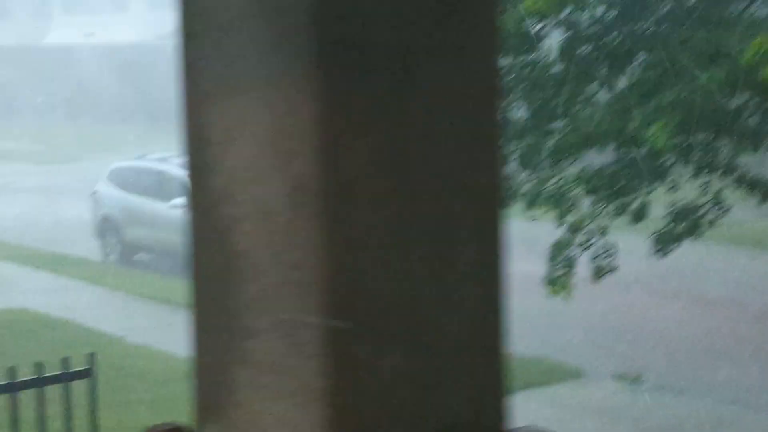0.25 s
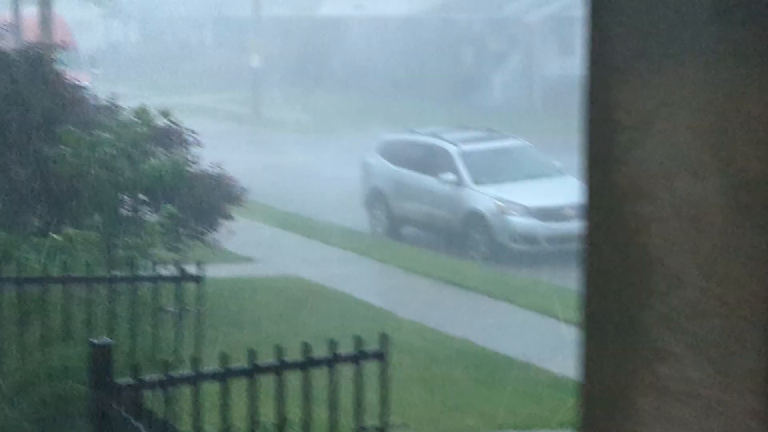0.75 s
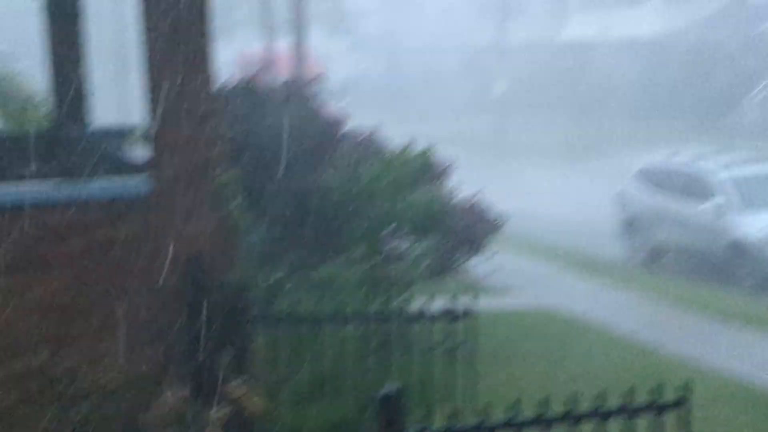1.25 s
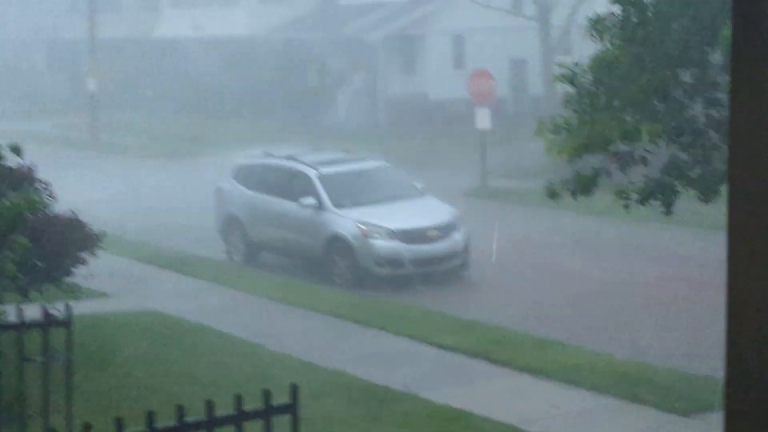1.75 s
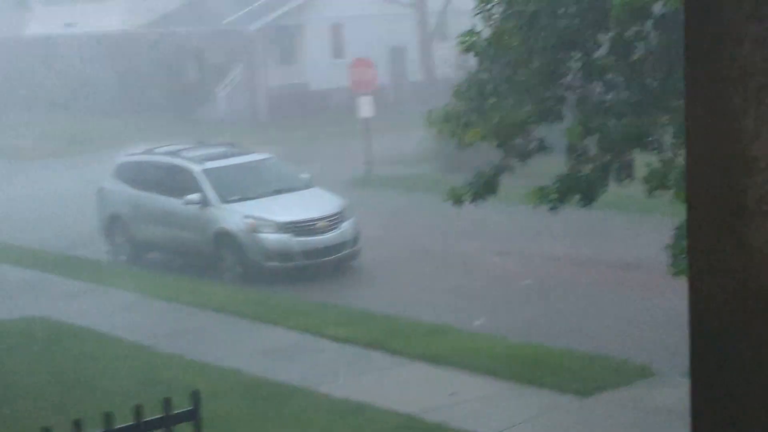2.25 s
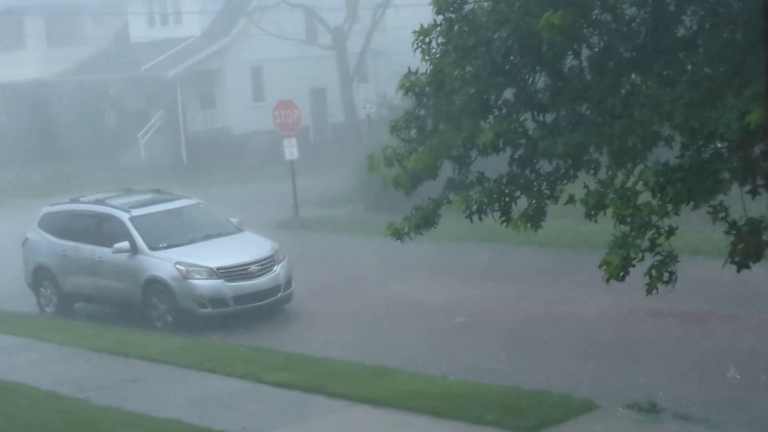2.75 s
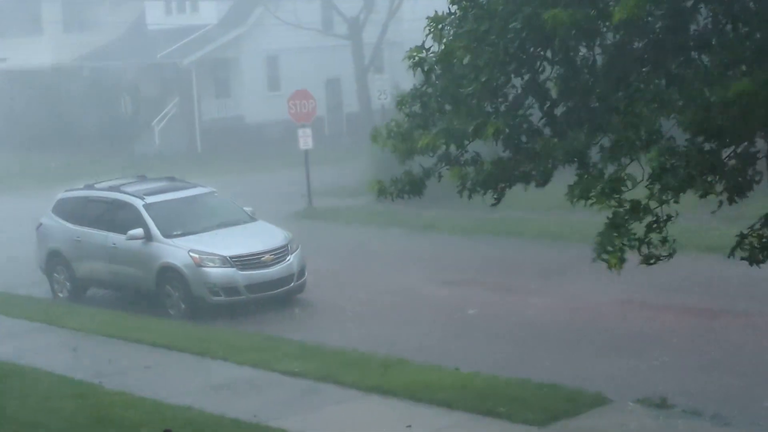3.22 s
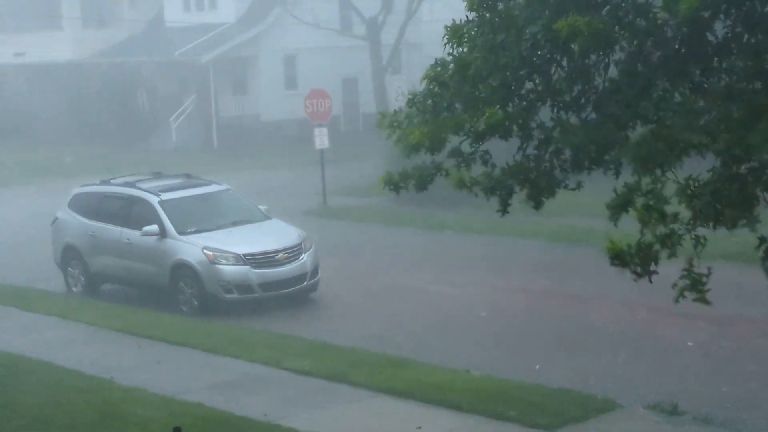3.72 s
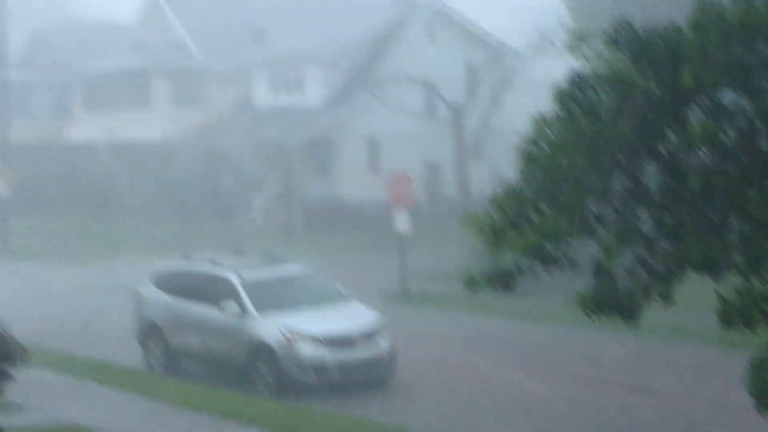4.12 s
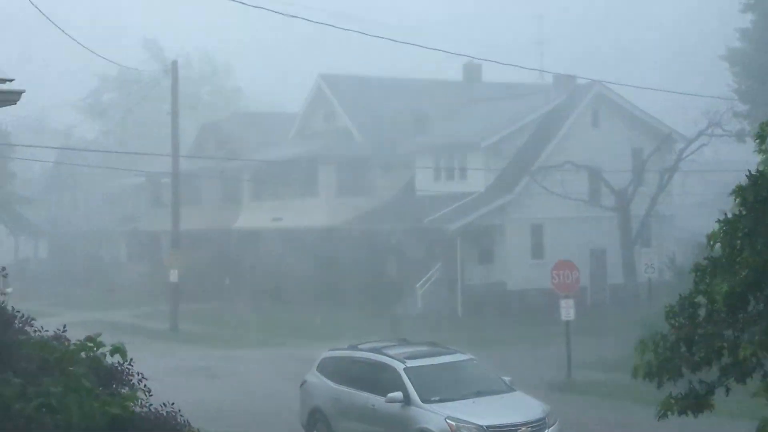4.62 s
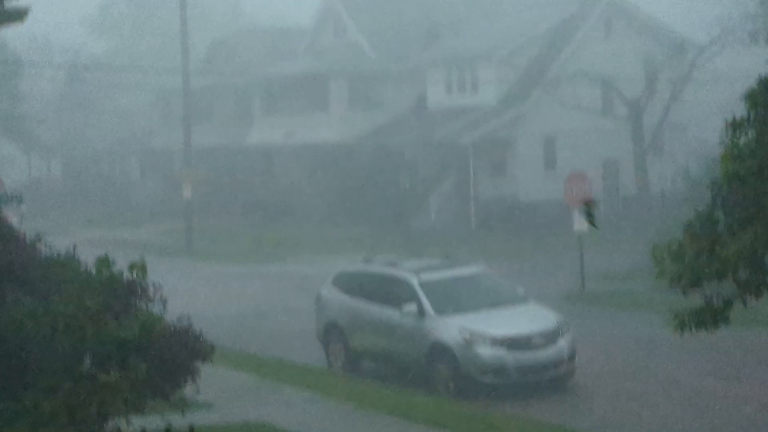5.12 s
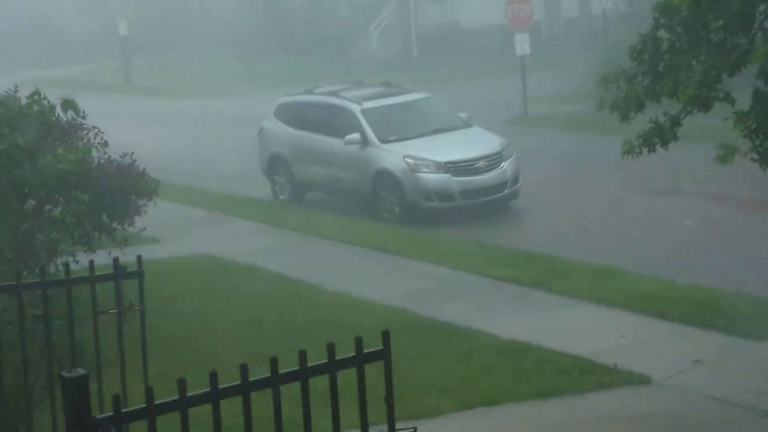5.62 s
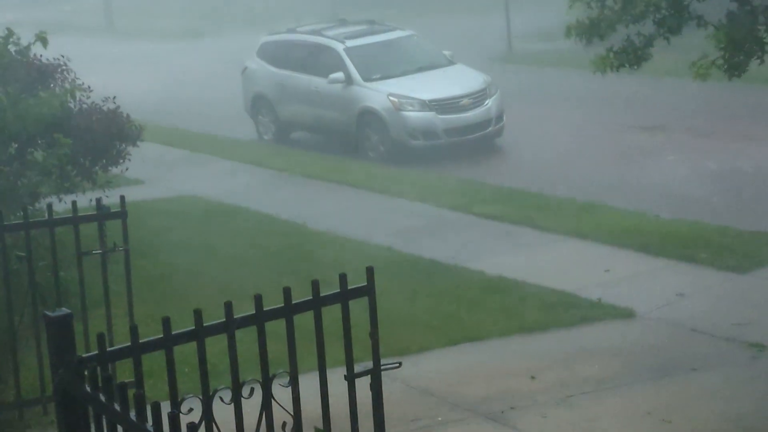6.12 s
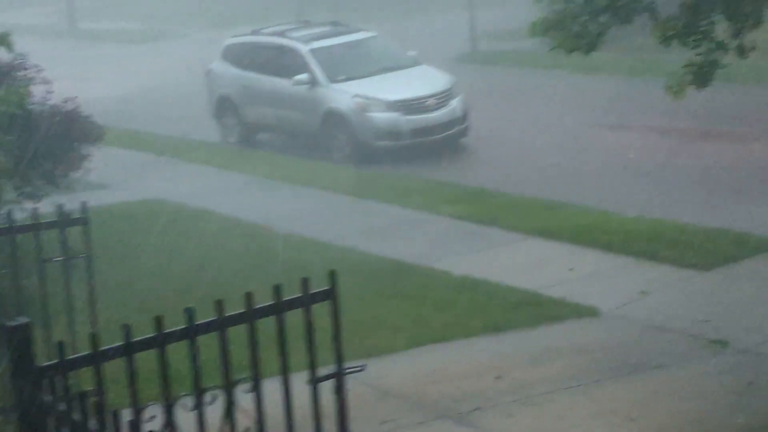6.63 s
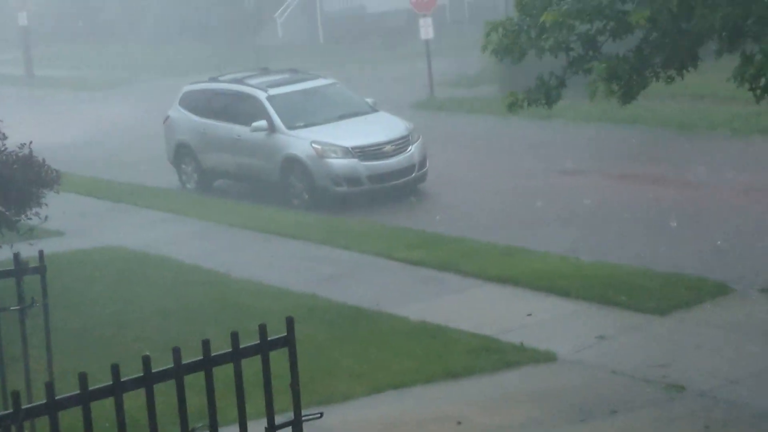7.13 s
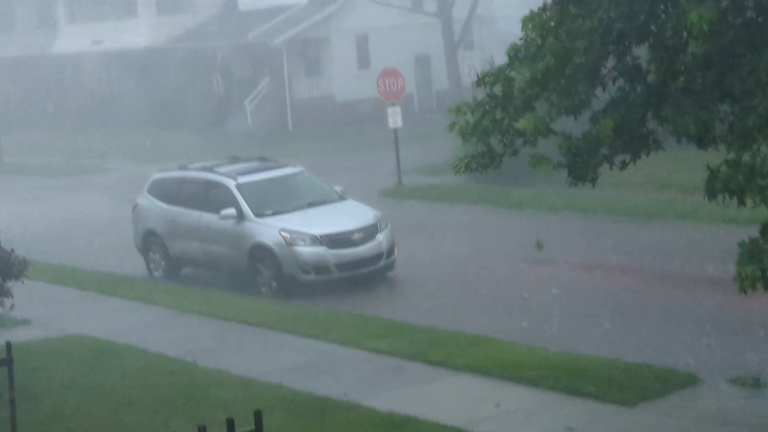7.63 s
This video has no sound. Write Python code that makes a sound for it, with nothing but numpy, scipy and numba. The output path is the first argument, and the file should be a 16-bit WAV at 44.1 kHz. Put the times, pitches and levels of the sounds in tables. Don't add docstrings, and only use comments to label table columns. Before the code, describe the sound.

Dense, wide rain hiss with fine patter and a low storm roar, already at full strength when it begins. Irregular wet slaps, bright sprays and plinking drops fall within reach. Early gusts buffet the left side of a phone-like microphone, with a few drops popping directly on it; after about three seconds the wind drops away and steady rain remains.

```python
import sys
import numpy as np
from scipy import signal
from scipy.fft import rfft, irfft, next_fast_len
from scipy.io import wavfile
from scipy.ndimage import uniform_filter1d
from numba import njit

SR = 44100
rng = np.random.default_rng(int(sys.argv[2]) if len(sys.argv) > 2 else 0)


def boost(x):
    u = np.asarray(x, float) / 20
    return 10 ** u


def transcribe(signal):
    frames = np.atleast_2d(signal).T
    limited = np.clip(frames, -1, 1)
    pcm = np.round(limited * 32767).astype(np.int16)
    wavfile.write(sys.argv[1], SR, pcm)


N = 346626
PORT_GAP = 21


def unit(x):
    return x / np.sqrt(np.mean(x ** 2))


def curves(table):
    s, *columns = np.transpose(table)
    return [np.interp(np.arange(N) / SR, s, c) for c in columns]


def colour(x, hz, db):
    size = next_fast_len(N)
    log_hz = np.log(np.arange(size // 2 + 1) * SR / size + 1)
    gain = boost(np.interp(log_hz, np.log(hz), db))
    return irfft(rfft(x, size) * gain, size)[..., :N]


def walk(rate):
    hold = int(SR / rate)
    steps = np.repeat(rng.standard_normal(N // hold + 1), hold)
    return 2.06 * uniform_filter1d(uniform_filter1d(steps, hold), hold)[:N]


def surround(count=22):
    lags = np.linspace(-PORT_GAP, PORT_GAP, count).astype(int)
    waves = rng.standard_normal((count, N))
    left = waves.sum(axis=0)
    right = sum(np.roll(w, lag) for w, lag in zip(waves, lags))
    return unit(np.array([left, right]))


# (time [s], strength [dB], left minus right [dB])
RAIN_STRENGTH = [(0, -1.5, -3), (.5, -0.5, -1), (.85, -1.5, -2), (1.1, -1.5, -0.5), (1.42, -.3, -.5),
                 (1.73, -3, -1), (2.17, -0.5, -1.5), (2.8, -3, -1.5), (3.1, -2, -1.5), (3.65, -3.5, -2.5),
                 (4.0, -3, -3), (4.27, -1.5, -3.5), (4.7, -3, -2.5), (5.28, -3.5, -2), (5.65, -3, -1.5),
                 (6.6, -3.5, -1.5), (7.1, -1.8, -1.5), (7.86, -3, -1.5)]
MID_SHARE, LOW_SHARE = 0.81, 0.58


def sheet():
    size = next_fast_len(N)
    field = rfft(surround(), size)
    hz = np.arange(size // 2 + 1) * SR / size
    octave = np.clip(np.log2(hz / 500 + 1e-9), 0, 5)
    high_db, pan_db = (c - c.mean() for c in curves(RAIN_STRENGTH))
    mid_db, low_db = MID_SHARE * high_db, LOW_SHARE * high_db
    sweep_db = 0.3 * walk(12) + 0.4 * walk(30)
    out = 0
    for k, db in enumerate([low_db, low_db, mid_db, (mid_db + high_db) / 2, high_db, high_db]):
        band = irfft(field * np.clip(1 - abs(octave - k), 0, 1), size)[:, :N]
        flicker_db = 0.5 * walk(14)
        out = out + band * boost(db + sweep_db + flicker_db)
    return out * boost(np.array([pan_db, -pan_db]) / 2)


@njit
def grains(start, hz, cycles, size, lag):
    out = np.zeros((2, N + 2048))
    for k in range(len(start)):
        turn = np.exp((2j * np.pi - 1 / cycles[k]) * hz[k] / SR)
        z, i = size[k] + 0j, int(start[k]) + 64
        for j in range(min(int(5 * cycles[k] * SR / hz[k]), 1500)):
            out[0, i + j + int(lag[k])] += z.imag
            out[1, i + j] += z.imag
            z *= turn
    return out[:, 64:N + 64]


SPRAY_HZ = 800 * 2 ** np.arange(0, 4.5, .5)


def burst(s, spray_db, length, count):
    u = rng.random((len(s), 6, count))
    age = -np.log((1 - u[:, 0]) * (1 - u[:, 5]) ** .12) * length[:, None]
    hz = 600 * 27 ** u[:, 1]
    db = np.array([np.interp(np.log(f), np.log(SPRAY_HZ), d) for f, d in zip(hz, spray_db)])
    drop_db = db - 1.1 * np.log(1 - u[:, 2])
    size = boost(drop_db) * hz / 8000 / np.sqrt(count)
    lag = PORT_GAP * (2 * u[:, 3] ** 1.3 - 1)
    start = np.clip((s[:, None] + age) * SR, 0, N - 1)
    cycles = 2.5 + 4 * u[:, 4] ** 2
    return grains(start.ravel(), hz.ravel(), cycles.ravel(), size.ravel(), lag.ravel())


def patter(per_s=200):
    count = int(per_s * N / SR)
    u = rng.random((count, 7))
    tint_db = 13 * u[:, 3 + np.array([0, 0, 1, 1, 1, 2, 2, 3, 3])]
    spray_db = tint_db - 1.1 * np.log(1 - u[:, 1:2])
    spray = burst(u[:, 0] * N / SR, spray_db, .002 + .008 * u[:, 2], count=30)
    rain_db = curves(RAIN_STRENGTH)[0]
    return unit(spray) * boost(rain_db - rain_db.mean() - 6)


# (time [s], breeze at the left port [dB], storm roar [dB])
AIR = [(0, -44, -40.5), (.7, -42, -45), (1.0, -47, -40), (1.4, -45, -44.5), (2.1, -49, -39),
       (2.85, -41, -41.5), (3.1, -62, -43.5), (3.55, -58, -44), (3.7, -61, -46.5), (4.2, -58, -45.5),
       (4.75, -52, -45), (5.1, -51, -45.5), (5.8, -51, -44.5), (6.1, -51, -49), (6.6, -62, -47.5),
       (7.0, -63, -44.5), (7.45, -68, -44.5), (7.86, -67, -49)]
# (frequency [Hz], level per Hz [dB])
ROAR_COLOUR = [(15, -63), (25, -39), (46, -8), (81, 4), (200, -2), (236, 1), (344, 0), (467, -4),
               (700, -33), (910, -74), (1540, -120)]


def roar():
    rumble = unit(colour(surround(count=4), *np.transpose(ROAR_COLOUR)))
    return rumble * boost(curves(AIR)[1] + walk(10))


FALL_DB, CREST = 20, 0.23


def puffs(rows):
    power = np.zeros((2, N))
    for s, thump_db, flutter_db, length in rows:
        first = max(int((s - 3 * length) * SR), 0)
        last = min(int((s + 3 * length) * SR), N)
        span = np.arange(first, last)
        age = (span / SR - s) / length
        shape_db = FALL_DB * (CREST - np.hypot(age, CREST))
        power[:, span] += boost(2 * (np.array([[thump_db], [flutter_db]]) + shape_db))
    return power


def even(x, seconds=0.0234):
    return x / np.sqrt(uniform_filter1d(x ** 2, int(seconds * SR)) + .1)


# (frequency [Hz], level per Hz [dB])
WIND_COLOUR = [(30, -34), (60, -13), (95, 0), (140, -1), (290, 0), (460, -8), (800, -21), (1500, -32),
               (2500, -60)]
# (time [s], thump [dB], flutter [dB], length [s])
LEFT_PUFFS = [(.025, -31, -36, 0.047), (.085, -31.5, -36, 0.063), (.244, -29, -28.5, .04),
              (.344, -33, -29, 0.082), (.425, -34, -32, 0.033), (.489, -29, -29, 0.028),
              (.559, -30, -23.5, 0.017), (.6, -29, -39, .04), (.64, -26, -28, 0.038),
              (.685, -33, -29, .025), (.805, -29, -34, 0.028), (.966, -24.5, -31.5, 0.019),
              (1.02, -46, -40, 0.028), (1.222, -26, -32.5, 0.042), (1.287, -31, -36, .03),
              (1.61, -31, -39, .04), (1.665, -31, -36, 0.048), (1.745, -38, -36, 0.027),
              (1.83, -40, -42, .04), (.745, -38, -45, 0.037), (1.09, -40, -43, 0.05), (1.36, -38, -42, .04),
              (2.83, -35, -43, 0.054), (2.375, -33, -39, .03), (2.595, -30, -27, 0.023),
              (1.91, -31, -28, 0.045), (2.01, -35, -48, 0.049), (2.125, -43, -29, 0.047),
              (2.265, -13.5, -21.5, 0.014), (2.3, -18, -16, 0.042), (2.348, -20, -33, 0.024),
              (2.447, -31, -22, 0.023), (2.556, -15, -13, 0.021), (2.719, -29, -28, 0.027),
              (2.918, -31, -28.5, 0.046), (2.988, -38, -45, .04), (3.437, -40, -46, .06),
              (3.542, -40, -47, 0.041), (5.77, -36, -48, 0.068)]
# (time [s], thump [dB], flutter [dB], length [s])
RIGHT_PUFFS = [(.08, -38, -50, .05), (.244, -35, -44, 0.039), (.364, -29.5, -36, 0.055),
               (.6, -31, -38, 0.055), (1.022, -56, -40, 0.036), (1.195, -36, -40, .06),
               (1.95, -51, -37, .06), (2.125, -53, -31, 0.06), (2.3, -43, -39, 0.14),
               (2.719, -39, -41, .05), (5.213, -42, -55, 0.066), (5.745, -33.5, -41, 0.088)]
# (time [s], thump [dB], flutter [dB], length [s])
EDDIES = [(3.157, -45, -41, 0.05), (3.34, -54, -49, 0.055), (4.22, -53, -42, 0.038), (4.31, -59, -61, .035),
          (4.448, -56, -45, .05), (4.514, -43, -40, 0.088), (4.82, -64, -44, 0.034), (4.864, -45, -52, .05),
          (5.46, -39.5, -45, 0.044), (6.241, -51, -56, .1), (6.793, -43, -47, 0.076),
          (7.26, -59, -40, 0.061), (7.6, -57, -54, 0.063)]
LEE_DB, FLUTTER_DB = -11, -3


def wind():
    share_db = np.array([[[0], [LEE_DB]], [[FLUTTER_DB], [FLUTTER_DB + LEE_DB]]])
    breeze = boost(2 * (curves(AIR)[0] + 0.76 * walk(28) + share_db))
    gusts = np.stack([puffs(LEFT_PUFFS + EDDIES), puffs(RIGHT_PUFFS + EDDIES)], axis=1)
    turbulence = colour(rng.standard_normal((2, N)), *np.transpose(WIND_COLOUR))
    thump = colour(turbulence, [170, 250], [0, -40])
    flutter = turbulence - thump
    out = 0
    for part, power in zip((thump, flutter), breeze + gusts):
        out = out + np.sqrt(power) * even(unit(part * boost(2.0 * walk(70))))
    return colour(out, [30, 52, 85], [-32, -3, 1.5])


# (time [s], energy over 1 ms of rain [dB], tilt [dB per octave], length [s])
SLAPS = [(0.341, 13, -2, .017), (0.376, 10.5, -2, 0.012), (0.45, 2, 1, 0.0049), (0.6, 5, 4.5, 0.0063),
         (0.662, 11, 0.5, 0.0038), (0.687, 8, 0.5, 0.0057), (.717, 2, 0, 0.005), (0.975, 12, -0.5, 0.019),
         (1.272, 11, 2, 0.0056), (1.508, 7.5, -4, 0.0083), (1.831, 0, -7, .015), (1.95, 12.5, 0.5, 0.0074),
         (2.078, 18.5, 0, 0.019), (2.814, 11, 1.5, 0.02), (3.202, 11, -1.5, 0.0072),
         (3.224, 13, -0.5, 0.011), (3.425, 12.5, -1, 0.0091), (3.777, 15.5, -1, 0.013),
         (4.008, 13, 0.5, 0.02), (4.042, 15.5, 0, 0.02), (4.44, 7.5, -5.5, 0.00506), (4.645, 7, 3, 0.0048),
         (4.803, 12, -3, 0.0072), (4.992, 10, 0, 0.0086), (5.387, -11, 5, 0.0073), (5.969, 1, -7, 0.0045),
         (6.015, -4, -2, 0.0047), (6.553, 8.5, 1.5, 0.0038), (7.233, 12.5, -0.5, 0.006),
         (7.646, 9, 2, 0.0083)]
# (time [s], energy [dB], lowest pitch [Hz], length [s])
SPRAYS = [(0.21, 8, 4500, .003), (0.426, 13, 6500, .005), (0.96, 17.5, 7000, 0.0069),
          (1.248, 7, 2600, .011), (1.592, 16, 4500, 0.02), (2.198, 12, 5000, 0.0078),
          (2.458, 11, 6500, .01), (2.477, 5, 3600, 0.0046), (2.677, 16, 6500, 0.0057),
          (2.758, 16.5, 2900, 0.019), (3.313, 12, 2900, 0.0043), (3.607, 15, 4500, 0.016),
          (4.224, 13.5, 6500, .008), (4.667, 9.5, 4540, 0.0025), (4.899, 13.5, 2900, 0.0083),
          (5.098, 12.5, 8000, 0.0036), (5.516, 15, 7500, 0.0054), (5.901, 12.5, 4000, .008),
          (6.38, 6, 6500, 0.0037), (6.624, 13, 2900, .018), (7.148, 12, 4800, 0.012),
          (7.367, 2, 4000, .004), (7.603, 11, 2900, 0.0065), (7.837, 15.5, 4500, 0.0089)]
# (time [s], energy [dB], pitch [Hz], length [s])
DROPS = [(0.16, 13, 6700, .003), (.483, 10, 1200, 0.0018), (0.719, 16, 5000, .003),
         (1.009, 20, 1900, 0.0087), (1.023, 14, 2600, .005), (1.468, 19, 4170, .004),
         (3.509, 17, 2600, .011), (4.44, 16, 3000, 0.0043), (4.476, 4, 7000, 0.0017),
         (5.509, 18, 3400, 0.0044), (5.657, 20.5, 2500, 0.0044), (6.718, 16, 6700, .003),
         (7.234, 15, 3200, 0.0029), (0.424, 13, 12000, 0.0016), (0.962, 20, 12500, 0.007),
         (1.018, 17, 900, 0.011), (1.585, 20, 14000, 0.0053), (2.074, 19, 11000, .004),
         (2.193, 18.5, 12500, 0.007), (4.311, 23, 900, .014), (4.17, 17, 2600, 0.005),
         (4.817, 14, 2200, 0.0053), (5.067, 17.5, 2390, .006), (7.595, 15, 12000, 0.0066),
         (1.254, 16, 6200, .012), (5.509, 15, 2200, 0.0051), (5.651, 16, 4200, 0.0037)]
SLAP_PIVOT_HZ = 3700
SPRAY_FALL_DB, DROP_FALL_DB = 13, 14


def octaves_above(hz):
    return np.log2(SPRAY_HZ / hz)


def runoff():
    rows = np.array(SLAPS + SPRAYS + DROPS)
    slaps = [db + tilt_db * octaves_above(SLAP_PIVOT_HZ) for _, db, tilt_db, _ in SLAPS]
    sprays = [db + SPRAY_FALL_DB * np.minimum(octaves_above(hz), 0) for _, db, hz, _ in SPRAYS]
    drops = [db - DROP_FALL_DB * abs(octaves_above(hz)) for _, db, hz, _ in DROPS]
    lift_db = np.interp(np.log(SPRAY_HZ), np.log([1100, 2900, 6700, 12500]), [9, 11.5, 9.5, 10])
    spray_db = np.array(slaps + sprays + drops) + lift_db
    spray = burst(rows[:, 0], spray_db, .7 * rows[:, 3], count=300)
    rain_db = curves(RAIN_STRENGTH)[0]
    return spray * boost(rain_db - rain_db.mean())


# (time [s], pitch [Hz], left [dB], right [dB])
TICKS = [(0.1607, 5800, -9, -14), (0.4253, 6600, -3, -32), (0.4295, 8600, -10, -11),
         (0.4578, 2100, -25, -14), (0.4683, 7800, -12, -29), (0.6625, 9100, -11, -14),
         (0.6892, 5900, -12, -24), (0.7182, 5000, -10, -12), (0.9596, 10600, -6, -23),
         (0.9629, 11500, -10, -9), (0.9664, 11500, -6, -15), (1.0113, 1900, -36, -17),
         (1.4709, 5600, -20, -3), (1.5924, 14600, -11, -16), (2.078, 10400, -16, -10),
         (2.0835, 7500, -13, -6), (2.09, 4600, -25, -11), (2.1929, 6400, -13, -40),
         (2.1964, 11200, -18, -8), (2.2014, 8300, -21, -8), (2.6742, 11500, -12, -35),
         (2.759, 10400, -13, -23), (3.2251, 11200, -13, -18), (3.316, 10600, -19, -13),
         (3.4304, 2500, -25, -34), (3.786, 8100, -21, -8), (4.038, 10200, -12, -19),
         (4.1712, 2500, -40, -19), (4.4382, 7800, -10, -40), (4.6478, 10800, -13, -23),
         (4.6672, 9900, -20, -8), (4.904, 11000, -17, -27), (5.5086, 3800, -10, -14),
         (5.5129, 12700, -9, -22), (5.6015, 11600, -16, -27), (5.6564, 3680, -28, -16),
         (5.6604, 2200, -29, -19), (5.8981, 6400, -10, -24), (5.9025, 6600, -21, -9),
         (6.3826, 10400, -11, -21), (6.7201, 7000, -18, -8), (7.1527, 13000, -25, -13),
         (7.2331, 3600, -16, -21), (7.3691, 11200, -20, -14), (7.6061, 7500, -25, -7),
         (7.6517, 3800, -23, -27), (7.8407, 8800, -16, -12)]
# (time [s], pitch [Hz], left [dB], right [dB])
RINGS = [
    (.4247, 6800, -3, -30),
    (.4262, 13000, -14, -30),
    (5.5625, 3500, -28, -22),
    (5.5125, 3370, -20, -15),
    (5.5095, 2300, -23, -18),
    (5, 2000, -29, -25),
    (7.2345, 3700, -18, -16),
    (1.3194, 4700, -20, -10),
    (4.1, 3100, -16, -16),
]
TICK_CYCLES, RING_CYCLES = 2.2, 7.0


def ticks():
    s, hz, *port_db = np.transpose(TICKS + RINGS)
    cycles = np.repeat([TICK_CYCLES, RING_CYCLES], [len(TICKS), len(RINGS)])
    no_lag = np.zeros(len(s))
    return np.array([grains(s * SR, hz, cycles, boost(db + 0.6), no_lag)[0] for db in port_db])


# (time [s], pitch [Hz], left [dB], right [dB])
POPS = [(.4842, 1100, -6, -30), (2.3035, 900, -13, -40), (2.318, 1300, -12, -40), (2.322, 1900, -14, -40),
        (2.5535, 1000, -10, -40), (2.557, 1300, -17, -40), (4.308, 800, -21, -21), (4.322, 1200, -21, -20),
        (5.782, 7500, -14, -6), (1.008, 700, -19, -22), (1.019, 560, -19, -22), (1.031, 450, -21, -24),
        (4.0502, 6500, -12, -4), (4.4722, 8100, -12, -5), (4.4395, 1500, -18, -16), (4.446, 800, -24, -22),
        (7.2335, 1200, -20, -18)]


def pops():
    s, hz, *port_db = np.transpose(POPS)
    cycles, no_lag = np.full(len(s), .75), np.zeros(len(s))
    hits = [grains(s * SR, hz, cycles, boost(db + 4), no_lag)[0] for db in port_db]
    return colour(np.array(hits), [150, 600], [-25, 0])


# (frequency [Hz], left [dB], right [dB])
PORTS = [(520.0, -21.3, -21.7), (850.0, -20.5, -17.5), (1250.0, -16.4, -14.4), (1700.0, -16.0, -11.6),
         (1950.0, -14.4, -8.4), (3500.0, -12.4, -9.0), (4050.0, -14.3, -10.0), (6300.0, -11.7, -5.4),
         (7050.0, -12.8, -7.0), (8200.0, -12.1, -4.3), (9700.0, -14.8, -11.5), (11300.0, -11.6, -13.8),
         (13700.0, -21.5, -20.3), (15500.0, -22.0, -24.2)]


def scene():
    hz, left_db, right_db = np.transpose(PORTS)
    rain = sheet() + patter() + runoff()
    rain = [colour(x, [250, *hz], [-45, *db]) for x, db in zip(rain, (left_db, right_db))]
    return boost(-7.5) * np.array(rain) + roar() + wind() + ticks() + pops()


def roll_off(x):
    return signal.sosfilt(signal.butter(12, 15890, fs=SR, output="sos"), x)


def record(dry):
    clipped = np.clip(dry, -1, 1)
    mix = colour(clipped, [15860, 15950], [0, -40])
    return roll_off(mix)


dry = scene()
out = record(dry)
transcribe(out)
```